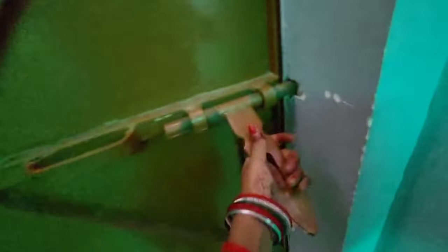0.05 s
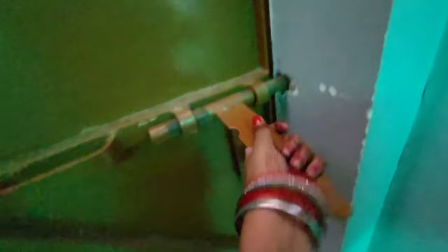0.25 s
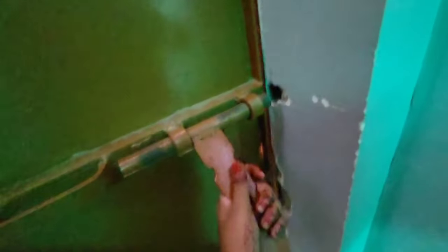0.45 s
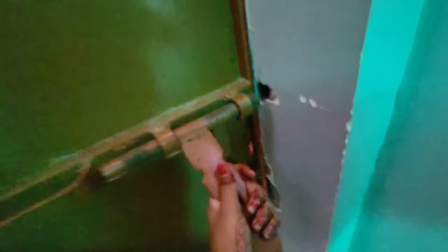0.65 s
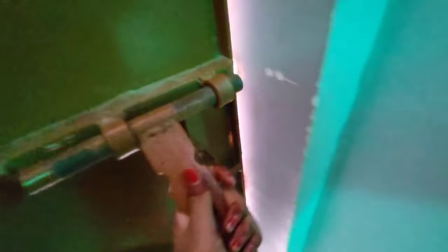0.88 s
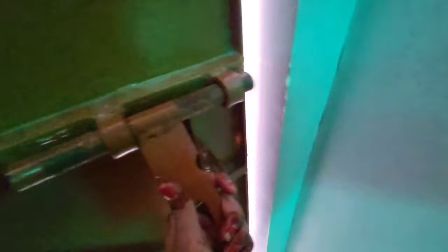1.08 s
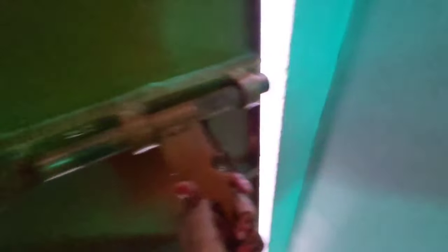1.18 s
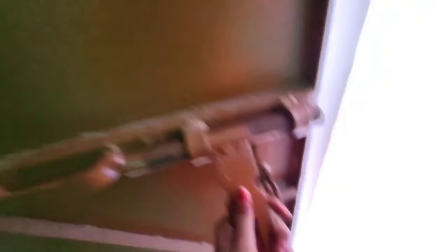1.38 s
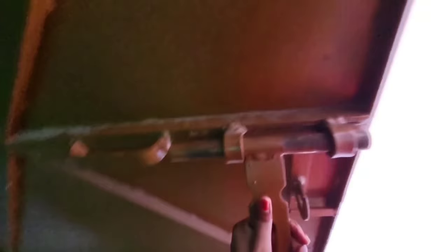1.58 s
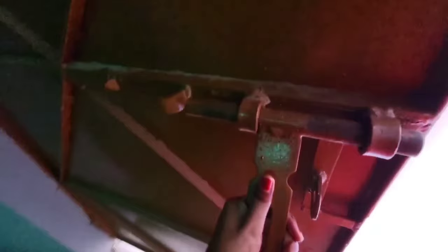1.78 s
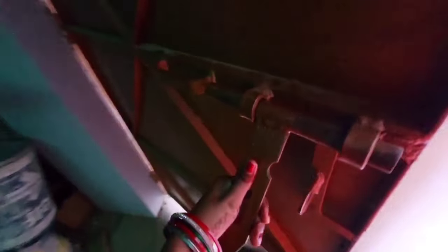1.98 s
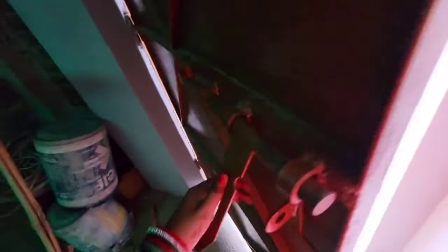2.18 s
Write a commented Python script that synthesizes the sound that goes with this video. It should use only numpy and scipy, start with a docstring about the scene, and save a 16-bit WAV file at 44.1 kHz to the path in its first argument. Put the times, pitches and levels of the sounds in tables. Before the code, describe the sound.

Close stereo pickup of a metal door: gritty bolt scrape with light ticks, low hollow boom and shudder, a rapid ringing clatter, one short high hinge squeak, soft knocks, then a faint swelling rustle.

```python
"""In a small hard room a steel bolt scrapes on a sheet-metal door: filtered noise, over a low rumble and hiss.
Light ticks, noise bursts, recur. The shoved sheet booms through its modes, groans in harmonics of
a gliding pitch and judders in its frame by stick-slip pulses, then breaks free in a rapid clatter of impacts.
The turning door rubs faintly; its hinge squeaks as a harmonic tone that leaves pin and room ringing.
Dull knocks of decaying noise follow, then a rustle as the door swings wide, and one soft bump."""
import sys
import numpy as np
from scipy import signal
from scipy.fft import rfft, irfft, next_fast_len
from scipy.io import wavfile
from scipy.ndimage import uniform_filter1d, map_coordinates

SR = 44100
rng = np.random.default_rng(int(sys.argv[2]) if len(sys.argv) > 2 else 0)


def persist_wave(psi):
    """Save psi, clipped to +-1, as 16-bit WAV."""
    counts = np.round(np.clip(psi, -1, 1) * 32767).astype(np.int16)
    wavfile.write(sys.argv[1], SR, np.atleast_2d(counts).T)


N = 99225  # samples, 2.25 s


def amp(db):
    """Logarithmic level: decibels to amplitude ratio."""
    return 10 ** (np.asarray(db) / 20)


def unit(x):
    """Normalization: scale to a root-mean-square value of 1."""
    return x / np.sqrt(np.mean(x ** 2) + 1e-20)


def along(points, hz):
    """Interpolation of (f/Hz, value) points on a logarithmic frequency axis."""
    f, value = np.transpose(points)
    return np.interp(np.log(hz + 1), np.log(f + 1), value)


def curves(rows):
    """Linear interpolation in time: one value per sample for each column after t/s."""
    seconds, *columns = np.transpose(rows)
    t = np.arange(N) / SR
    return [np.interp(t, seconds, column) for column in columns]


def wobble(rate):
    """Band-limited fluctuation: a smooth curve through random knots, rate of them per second."""
    knots = rng.standard_normal(int(N * rate / SR) + 4)
    return map_coordinates(knots, [np.arange(N) * rate / SR])


def filtered(x, response):
    """Linear filtering: the spectrum of x is multiplied by a response of frequency."""
    padded = next_fast_len(N + SR // 2)
    hz = np.fft.rfftfreq(padded, 1 / SR)
    return irfft(rfft(x, padded) * response(hz), padded)[..., :N]


def add(out, s, x):
    """Superposition: x is mixed into out from s seconds on."""
    start = int(np.clip(round(s * SR), 0, N - 1))
    out[:, start:] += x[..., :N - start]


# Correlation of left and right channels: f/Hz, likeness (1 alike, 0 unrelated)
CHANNEL_LIKENESS = [(130, 0.9), (290, 0.9), (640, 0.16), (1400, 0.041), (15000, 0)]
BITE_HZ, BITE_OCTAVES = 2500, 0.76  # centre and width of an optional boost


def noise(spectrum, tilt_db=0, bite_db=0):
    """Diffuse-field coherence: stereo noise of rms 1, alike in the bass, unrelated in the treble."""
    def response(hz):
        angle = np.arccos(np.clip(along(CHANNEL_LIKENESS, hz), -1, 1)) / 2
        bite = bite_db * np.exp(-(np.log2((hz + 1) / BITE_HZ) / BITE_OCTAVES) ** 2)
        tilt = tilt_db * np.log2(1 + hz / 1000)
        return amp(along(spectrum, hz) + tilt + bite) * [np.cos(angle), np.sin(angle)]

    mid, side = filtered(rng.standard_normal((2, N)), response)
    return unit(np.array([mid + side, mid - side]))


# Decay time to -60 dB of door and room, before each sound's stretch factor: f/Hz, t60/s
DECAY_TIME = [(60, 0.86), (160, 1.68), (420, 0.89), (1100, 0.58), (2900, 0.41), (7700, 0.34), (15000, 0.34)]


def dying(x, stretch=1):
    """Frequency-dependent damping: each band of x decays exponentially at the pace of door and room."""
    hz, t, bands = signal.stft(x, SR, nperseg=512)
    t60 = stretch * along(DECAY_TIME, hz)[:, None]
    return signal.istft(bands * amp(-60 * t / t60), SR, nperseg=512)[1][:, :N]


def blow(spectrum, fast_db, fast_t60, attack_s, stretch=1, tilt_db=0, bite_db=0):
    """Impact excitation: a short burst and the dense reverberant ringing that it leaves."""
    t = np.arange(N) / SR
    burst = 1 + amp(fast_db - 60 * t / fast_t60)
    attack = 1 - np.exp(-t / attack_s)
    return dying(noise(spectrum, tilt_db, bite_db), stretch) * burst * attack


def gliding(rows, jitter):
    """Phase as the integral of frequency: phase and level of a short rubbed note with jittered pitch."""
    hz, db = curves(rows)
    t = np.arange(N) / SR
    phase = 2 * np.pi * np.cumsum(hz * (1 + jitter * wobble(550))) / SR
    sounding = (t > rows[0][0]) & (t < rows[-1][0])
    return phase, np.sqrt(2) * amp(db) * sounding


def answer(tone, body):
    """Convolution with an impulse response: a body's ringing after a tone, as strong as the tone."""
    echo = signal.fftconvolve(tone[None], body, axes=1)[:, :N]
    return echo * tone.std() / echo.std(axis=1, keepdims=True)


# Spectrum of the room's hiss: f/Hz, relative level/dB
HISS_TONE = [(60, -20), (100, -9), (250, -9), (520, -9), (1100, -17), (2000, -16), (4000, -26), (9000, -26),
             (15500, -28)]
HISS_DB = -55.5


def room_hiss():
    """Stationary background noise: the quiet hiss of the room."""
    return amp(HISS_DB) * noise(HISS_TONE)


# Level of the sliding bolt, before its gain and final fade: t/s, level/dB
SLIDE = [(0.0, -46.5), (0.02, -39), (0.144, -41), (0.154, -36), (0.266, -41.5), (0.326, -45.5),
         (0.464, -40.5), (0.5, -45.5), (0.53, -34)]
# Spectrum of the scrape: f/Hz, relative level/dB
SCRAPE_TONE = [(120, -45), (200, -4.5), (471, -7.5), (554, -3), (923, -7), (1170, -5), (1680, -7),
               (1950, -10.5), (14700, -22), (15500, -23)]
SLIDE_GAIN_DB, SLIDE_END_S, SLIDE_FADE_DB_PER_S = 5, 0.514, 156


def bolt_scrape():
    """Sliding friction: roughness of the bolt's path gives grainy noise, which fades after the slide."""
    t = np.arange(N) / SR
    fade_db = SLIDE_FADE_DB_PER_S * np.maximum(t - SLIDE_END_S, 0)
    level_db = curves(SLIDE)[0] + SLIDE_GAIN_DB - fade_db
    return amp(level_db + 1.36 * wobble(400)) * noise(SCRAPE_TONE)


# Mean level of the handled sheet's rumble: t/s, level/dB
HANDLING = [(0, -34.5), (.2, -36), (.7, -25), (.98, -34.5), (1.15, -42), (1.4, -50.5), (1.85, -55.5),
            (2.25, -52)]
# Spectrum of the rumble: f/Hz, relative level/dB
RUMBLE_TONE = [(20, -37), (48, -1), (68, -2), (98, 1.5), (135, -6), (190, -9), (300, -21), (700, -53.5),
               (2000, -62.5)]


def sheet_rumble():
    """Low-frequency plate vibration: the handled sheet rumbles with a slow random level."""
    level_db = curves(HANDLING)[0] + 1.5 * wobble(22)
    return amp(level_db) * noise(RUMBLE_TONE)


# Ticks of the loose bolt, before a common gain: t/s, level/dB
TICKS = [(.148, -46.5), (0.182, -41), (0.514, -50), (.745, -44), (.812, -49), (.916, -56.5), (1.492, -54),
         (1.659, -72), (1.723, -53), (1.883, -56.5), (1.965, -53), (2.209, -48)]
# Spectrum of a tick: f/Hz, relative level/dB
TICK_TONE = [(300, -14), (1500, 8), (4000, -2), (9000, -1), (15000, 0)]


def bolt_ticks():
    """Brief contact of light, hard bodies: the loose bolt gives short, treble-rich impacts."""
    out = np.zeros((2, N))
    for s, db in TICKS:
        tick = blow(TICK_TONE, fast_db=11, fast_t60=0.0077, attack_s=0.00065)
        add(out, s, amp(db + 3) * tick)
    return out


# Natural modes of the door: f/Hz, level/dB (varied at random per blow), t60/s, left minus right level/dB
DOOR_MODES = [(90.7, -2.5, 0.59, -2), (94.6, -3, 1.1, -2), (171.6, 1, 0.41, -2), (183, -0.5, 0.69, 0),
              (195.7, -2.5, 1.23, -2), (294.6, -24, 1.5, 2), (345.3, -5.5, 0.9, 3), (400.8, -4, 0.88, -7.5),
              (535, 4, 0.4, -1), (647, -8, 0.5, -9), (674, -2, 0.35, 16.5), (914, 0, .45, 5),
              (1716, 1, .35, -1.5), (2214, 1.5, 0.22, -0.5)]


def panel(soft_hz):
    """Modal superposition: damped sines rung once; a soft contact excites the high modes less."""
    t, out = np.arange(N) / SR, np.zeros((2, N))
    sides = np.array([[.5], [-.5]])
    draws = rng.standard_normal((len(DOOR_MODES), 3))
    for (hz, db, t60, pan_db), (level, phase, apart) in zip(DOOR_MODES, draws):
        # unlike channels differ in phase
        angle = np.arccos(np.clip(along(CHANNEL_LIKENESS, hz), -1, 1))
        spread = angle * np.sign(apart) * sides
        gain = amp(db + level + pan_db * sides) / (1 + (hz / soft_hz) ** 2)
        ring = np.sin(2 * np.pi * hz * t + np.pi * phase + spread)
        out += gain * amp(-60 * t / t60) * ring
    return out * (1 - np.exp(-t / 0.0011))


# Shoves against the sheet: t/s, level/dB
SHOVES = [(.207, -21.5), (.223, -24.5), (.245, -21.5)]
# Spectrum of the boom: f/Hz, relative level/dB
BOOM_TONE = [(30, -19.5), (87, 0.5), (140, -5), (190, -4.5), (300, -8.5), (380, -6), (480, -15.5),
             (650, -16), (900, -22), (1500, -28.5), (5000, -58), (11000, -90)]
SHOVE_RING_DB, SHOVE_SOFT_HZ = -3, 302


def shove():
    """Soft impact on a plate: the pushed sheet booms, its low modes favoured."""
    out = np.zeros((2, N))
    for s, db in SHOVES:
        thud = blow(BOOM_TONE, fast_db=1.5, fast_t60=0.13, attack_s=0.001, stretch=0.86)
        ring = amp(SHOVE_RING_DB) * panel(SHOVE_SOFT_HZ)
        add(out, s, amp(db) * (thud + ring))
    return out


# Groan of the stuck sheet, pitch before jitter: t/s, f/Hz, level/dB
GROAN = [(.207, 94.83, -26.5), (.228, 93, -32), (.24, 92.6, -17), (.254, 100.3, -15), (.268, 96, -14.5),
         (.285, 93.5, -34), (.32, 97, -42)]
# Its harmonics: multiple of the pitch, relative level/dB
GROAN_PARTIALS = [(1, -1.5), (2, 0), (4, -21.5)]
GROAN_JITTER = .03  # fraction of the pitch


def groan():
    """Frictional self-oscillation: the stuck sheet groans against its frame in low harmonics."""
    phase, level = gliding(GROAN, GROAN_JITTER)
    partials = 0
    for k, db in GROAN_PARTIALS:
        partials = partials + amp(db) * np.sin(k * phase + rng.uniform(0, 2 * np.pi))
    return level * partials


# Slipping of the door's edge along the frame: t/s, slip rate f/Hz, level/dB
JUDDER = [(.28, 50, -23), (.315, 48, -17.5), (.38, 47, -18), (.42, 43, -22.5), (.46, 45, -20.5),
          (.515, 52.4, -18.5), (.54, 52, -24)]
# Spectrum of the sheet's response to a slip: f/Hz, relative level/dB
JUDDER_TONE = [(25, -14), (45, 7.5), (92, 5), (140, -10.5), (190, 1.5), (260, -20.5), (500, -20.5),
               (1000, -40), (3000, -58)]
SLIP_SCATTER_S, SLIP_SCATTER_DB = 0.00073, 1.5
BEND_DELAY_S = .012  # at 100 Hz


def judder():
    """Stick-slip with dispersion: each slip jolts the sheet, whose high bending waves travel faster."""
    rate, db = curves(JUDDER)
    t = np.arange(N) / SR
    touching = (t > JUDDER[0][0]) & (t < JUDDER[-1][0])
    slip_count = np.cumsum(rate * touching) / SR
    slips = np.flatnonzero(np.diff(np.ceil(slip_count)))
    late, size = rng.standard_normal((len(slips), 2)).T
    at = np.clip(slips + late * SLIP_SCATTER_S * SR, 0, N - 1).astype(int)
    # dividing by the root of the rate keeps the power even
    jolts = np.bincount(at, amp(SLIP_SCATTER_DB * size) / np.sqrt(rate[at]), N)

    def bending(hz):
        # group delay falls as 1 / sqrt(frequency)
        dispersion = np.exp(-4j * np.pi * BEND_DELAY_S * 10 * np.sqrt(hz))
        return amp(along(JUDDER_TONE, hz)) * dispersion

    flex = unit(filtered(jolts, bending)) * np.sqrt(touching.mean())
    return flex * amp(db) * uniform_filter1d(1. * touching, size=200)


# Clashes as the door comes free: t/s, level/dB, treble tilt/(dB per octave), bite/dB
CLASHES = [(0.5366, -14.5, 1.3, 8.5), (.549, -18, 1.9, 1), (.567, -20, 1.5, 0), (.5865, -16, 1.9, -2),
           (.604, -15.5, 7.3, 8), (.621, -17.5, -2.5, -2)]
# Spectrum of a clash before tilt and bite: f/Hz, relative level/dB
CLASH_TONE = [(29, -54.5), (50, -42), (70, -11), (137, -30), (178, -10), (288, -17), (394, -13),
              (455, -16.5), (538, -10), (735, -17), (1340, -17), (1740, -13.5), (2110, -19), (12200, -28.5),
              (15500, -32)]
CLASH_FAST_DB, CLASH_FAST_T60, CLASH_RING_DB = 4.5, 0.092, -11  # dB, s, dB


def clatter():
    """Repeated hard impact: bolt, hasp and door edge clash in quick succession, ringing the modes."""
    out = np.zeros((2, N))
    for s, db, tilt, bite in CLASHES:
        crash = blow(CLASH_TONE, CLASH_FAST_DB, CLASH_FAST_T60, attack_s=0.0015,
                     stretch=0.97, tilt_db=tilt, bite_db=bite)
        ring = amp(CLASH_RING_DB) * panel(soft_hz=6000)
        add(out, s, amp(db) * (amp(-1) * crash + ring))
    return out


# Mean level of the rub while the door turns: t/s, level/dB
TURN = [(.75, -64.5), (.85, -53), (.95, -53.5), (1.22, -53.5), (1.31, -50), (1.38, -58.5), (1.55, -54),
        (1.64, -69), (1.8, -67)]
# Spectrum of the rub: f/Hz, relative level/dB
TURN_TONE = [(300, -31), (1000, 1), (2000, -1), (4000, -8.5), (9000, -11), (15500, -14.5)]


def turning_rub():
    """Friction noise: the turning door rubs faintly with a random level."""
    level_db = curves(TURN)[0] + 1.7 * wobble(300)
    return amp(level_db) * noise(TURN_TONE)


# Hinge squeak, pitch before jitter: t/s, f/Hz, level/dB
SQUEAK = [(1.071, 2550, -81), (1.078, 2530, -31), (1.085, 2620, -25), (1.092, 2510, -48),
          (1.099, 2534, -18.5), (1.108, 2511, -17.5), (1.129, 2556, -20.5), (1.14, 2490, -73),
          (1.156, 2430, -42), (1.165, 2580, -60)]
# Its harmonics: multiple of the pitch, relative level/dB (flutters above the first)
OVERTONES = [(1, 1), (2, -11.5), (3, -15), (4, -21.5), (5, -23), (6, -34)]
SQUEAK_JITTER = 0.0064  # fraction of the pitch
SQUEAK_DRY_DB, SQUEAK_ROOM_DB = -5, -8.5
OVERTONE_FLUTTER_DB, FLUTTER_PER_S = 3.5, 170  # the rub is uneven in its overtones
PIN_HZ, PIN_T60, PIN_DB = 2550, 0.44, -9.5  # Hz, s, dB


def hinge():
    """Friction-driven resonance: a dry hinge sings in harmonics; its pin and the room ring on."""
    phase, level = gliding(SQUEAK, SQUEAK_JITTER)
    t = np.arange(N) / SR
    channel_phase = np.array([[0], [1]])
    pin = amp(-60 * t / PIN_T60) * np.sin(2 * np.pi * PIN_HZ * t + channel_phase)
    room = dying(noise([(100, 0.0041), (16000, 0.0055)]), stretch=0.82)  # nearly white
    tones = []
    for k, db in OVERTONES:
        flutter_db = (k > 1) * OVERTONE_FLUTTER_DB * wobble(FLUTTER_PER_S)
        tones.append(level * amp(db + flutter_db) * np.sin(k * phase))
    sung = sum(amp(SQUEAK_DRY_DB) * tone + amp(SQUEAK_ROOM_DB) * answer(tone, room) for tone in tones)
    return sung + amp(PIN_DB) * answer(tones[0], pin)


# Knocks of the swinging door, before a common gain: t/s, level/dB
KNOCKS = [(1.301, -60), (1.419, -43), (1.441, -37), (1.474, -45), (1.506, -38), (1.547, -43.5),
          (1.578, -49)]
# Spectrum of a knock: f/Hz, relative level/dB
KNOCK_TONE = [(47, -37), (80, -4), (112, -2.5), (131, -58), (180, 3), (257, -8), (404, 0), (483, -1.5),
              (1580, -9.5), (9000, -40.5), (11700, -85), (19800, -120)]


def knocks():
    """Impact with weak treble: the swinging door gives dull knocks."""
    out = np.zeros((2, N))
    for s, db in KNOCKS:
        knock = blow(KNOCK_TONE, fast_db=-3, fast_t60=0.2, attack_s=0.00087)
        add(out, s, amp(db + 0.5) * knock)
    return out


# Mean level of the rustle as the door swings wide: t/s, level/dB
SWING = [(1.76, -81.5), (1.86, -56), (1.97, -50), (2.05, -46.5), (2.17, -47), (2.25, -43)]
# Spectrum of the rustle: f/Hz, relative level/dB
RUSTLE_TONE = [(88, -42), (150, -18), (217, -20), (274, -7), (308, -4.5), (411, -4.5), (1000, -8),
               (1980, -10.5), (15500, -27.5)]


def swing_rustle():
    """Amplitude-modulated noise: a rustle swells unevenly as the door swings wide."""
    level_db = curves(SWING)[0] + 1.3 * wobble(250)
    return amp(level_db) * noise(RUSTLE_TONE)


# Spectrum of the soft bump: f/Hz, relative level/dB
BUMP_TONE = [(20, -18), (45, -15), (85, -8), (170, -19), (400, -30.5), (2000, -66)]
BUMP_S, BUMP_DB = 1.955, -43.5


def soft_bump():
    """Soft impact: a slow attack and a low spectrum make one gentle bump."""
    out = np.zeros((2, N))
    bump = blow(BUMP_TONE, fast_db=5, fast_t60=0.095, attack_s=.008, stretch=0.63)
    add(out, BUMP_S, amp(BUMP_DB) * bump)
    return out


def scene():
    """Linear superposition: all the door's sounds over the room's quiet hiss."""
    out = room_hiss() + bolt_scrape() + sheet_rumble() + bolt_ticks()
    out = out + shove() + groan() + judder() + clatter()
    return out + turning_rub() + hinge() + knocks() + swing_rustle() + soft_bump()


# Level difference of the two microphones: f/Hz, left minus right level/dB
MICROPHONE_BALANCE = [(130, 1), (290, 0), (640, 1), (1400, -0.5), (3100, -1), (15000, 1)]
TOP_HZ = 15500


def record(dry):
    """Transducer response: two slightly unlike microphones, a ceiling on amplitude and a band limit."""
    sides = np.array([[.5], [-.5]])
    heard = filtered(dry, lambda hz: amp(along(MICROPHONE_BALANCE, hz) * sides))
    return filtered(np.clip(heard, -1, 1), lambda hz: hz < TOP_HZ)


dry = scene()
out = record(dry)
persist_wave(out)
```